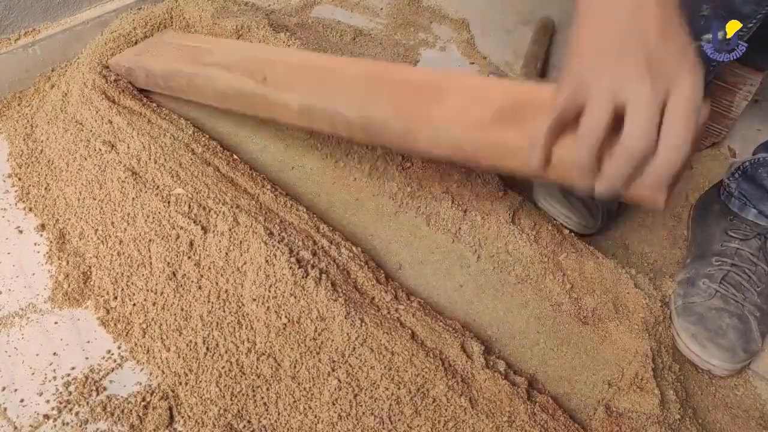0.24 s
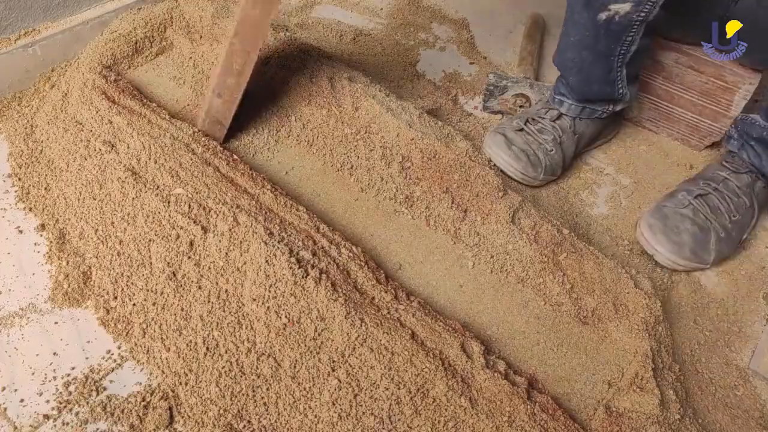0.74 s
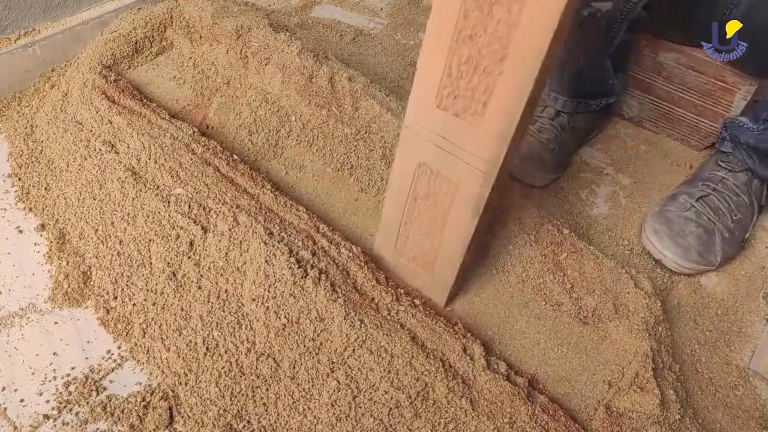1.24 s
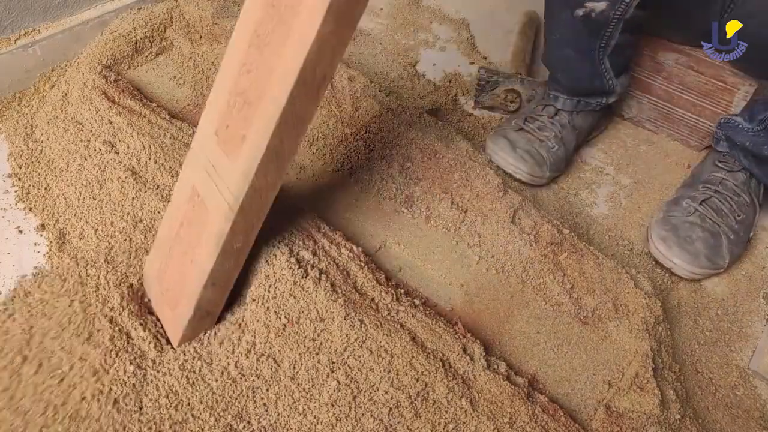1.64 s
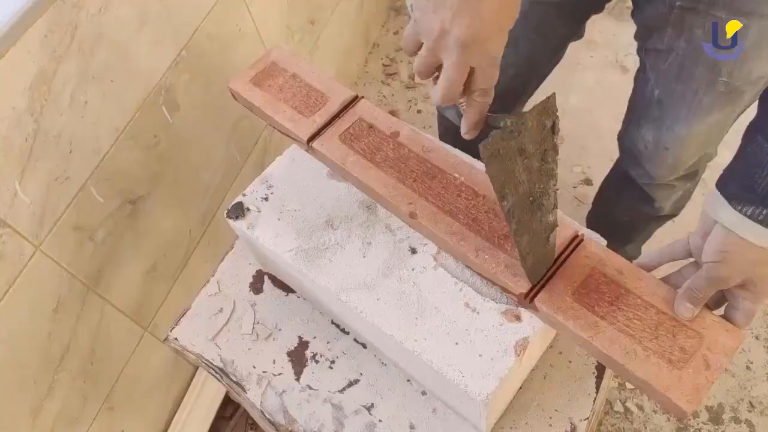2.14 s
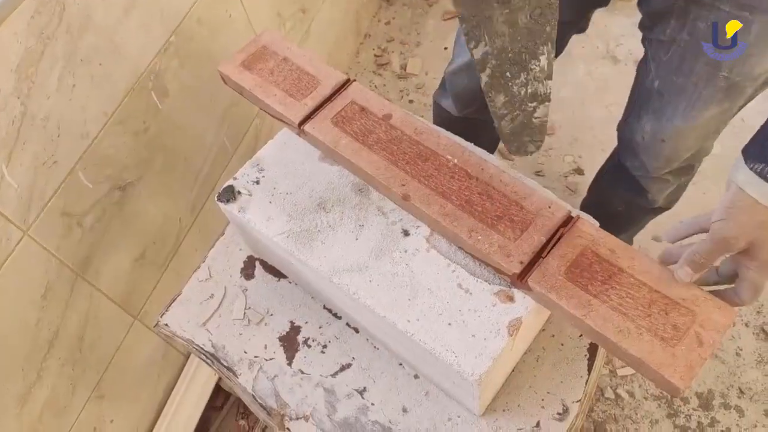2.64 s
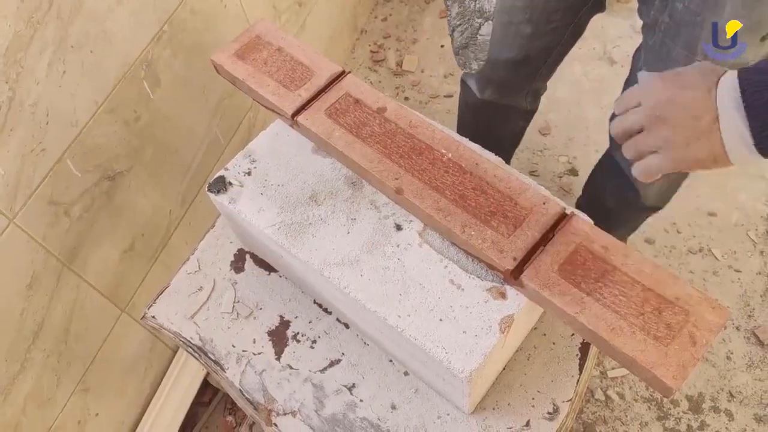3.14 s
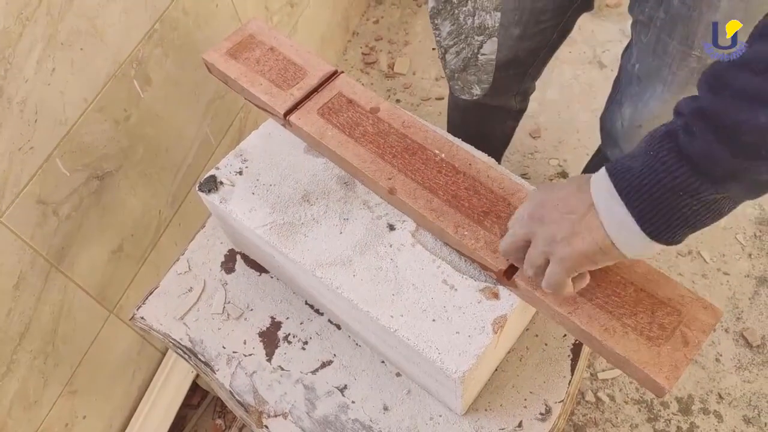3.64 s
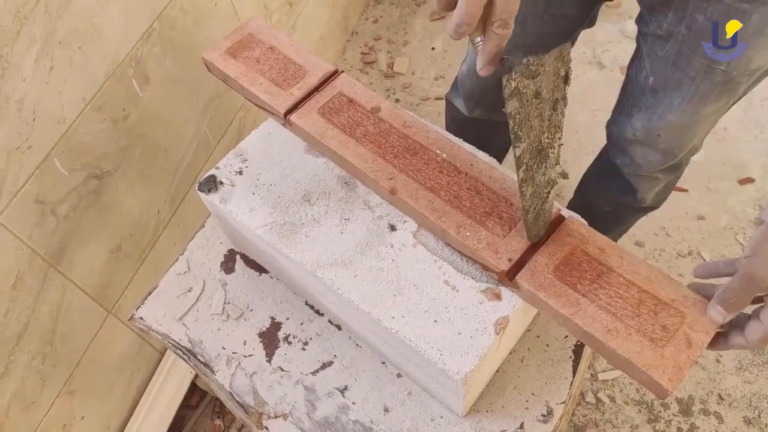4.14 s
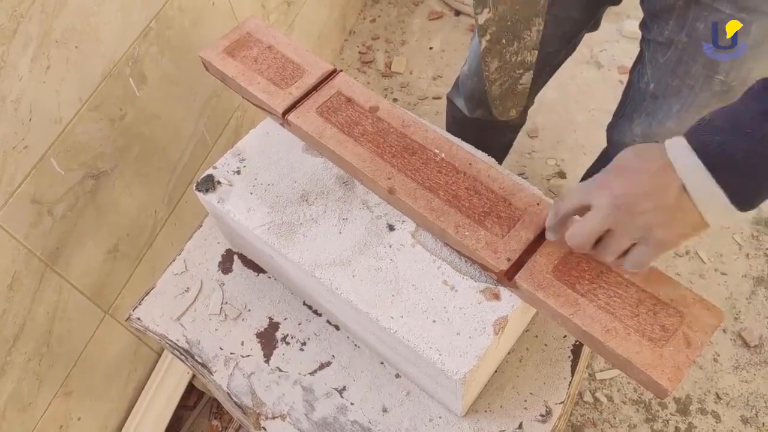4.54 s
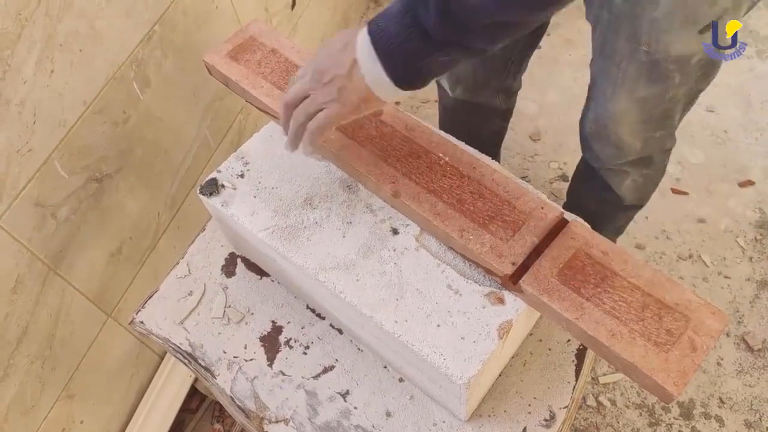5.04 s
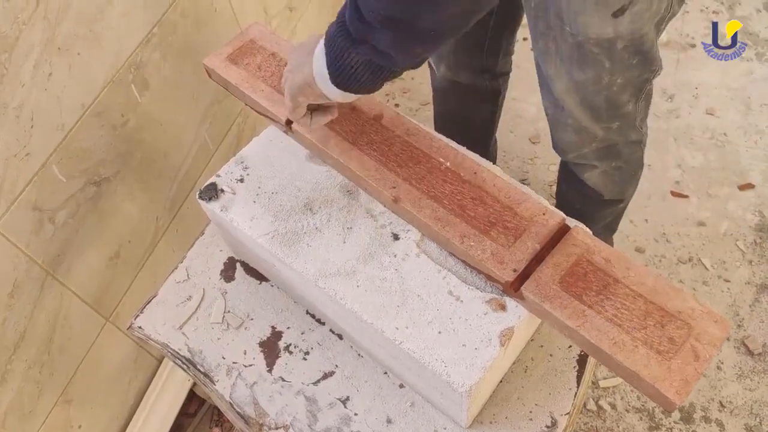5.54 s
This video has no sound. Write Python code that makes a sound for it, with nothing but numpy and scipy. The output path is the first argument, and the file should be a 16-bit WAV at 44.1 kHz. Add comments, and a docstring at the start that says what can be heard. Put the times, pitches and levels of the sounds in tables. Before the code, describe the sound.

Soft sandy rubbing and one heavy thud, then an airy outdoor rush with sharp trowel chops on brick, small clicks, finger scuffs and a brief wind gust.

```python
"""Masonry work at arm's length: contact noise, modal ringing and diffuse reflection. First a clay brick is
dragged out of sand, thumped on end and twisted: coloured noise under friction envelopes. Then the outdoor
background of filtered noise rises quickly, and a steel trowel chops three times: grit bursts crunch and
decaying sine modes ring. Fingers and blade scuff, knock and snap the pieces, and nearby walls echo. Late in the
scene a gust of low-frequency noise buffets the microphone."""
import sys
import numpy as np
from scipy import signal
from scipy.fft import rfft, irfft, next_fast_len
from scipy.io import wavfile
from scipy.ndimage import uniform_filter1d, minimum_filter1d

SR = 44100
rng = np.random.default_rng(int(sys.argv[2]) if len(sys.argv) > 2 else 0)


def wav_record(signal):
    """Record a signal, one row per channel, as 16-bit PCM in the file named by sys.argv[1]."""
    frames = np.transpose(np.atleast_2d(signal))
    bounded = np.clip(frames, -1, 1)
    # unit amplitude maps onto the largest positive 16-bit level
    quanta = np.round(bounded * 32767).astype(np.int16)
    wavfile.write(sys.argv[1], SR, quanta)


N = 255337
TIME = np.arange(N) / SR

# Rise, fall, attack, release, build and die times are exponential time constants.
# Spectra list relative levels; noise made from them is scaled to rms 1. L-R is left minus right.

# Outdoor rush spectrum: f/Hz, level/dB
RUSH_SPECTRUM = [(15, -42), (25, -9), (44, -11), (122, -11), (297, -0.5), (421, -3.5), (804, -4.5),
                 (1140, -9), (2300, -8), (2920, -16.5), (7100, -20.5), (9300, -31.5), (12200, -39),
                 (13900, -44), (15500, -62)]
# Wind buffeting spectrum: f/Hz, level/dB
BUFFET_SPECTRUM = [(12, -23), (25, -16), (48, 0), (90, -7.5), (160, -10.5), (300, -19), (800, -68)]
# Coherence of left and right in noise: f/Hz, correlation
STEREO_CORRELATION = [(40, 0.9), (120, 1), (250, 0.94), (450, 0.68), (1000, 0.19), (2000, -0.012),
                      (3500, -0.041), (7000, 0.018), (12000, 0.068)]
# Gust eddies thumping the microphone: t/s, level/dB
EDDIES = [(4.55, -47), (4.64, -42), (4.759, -28.5), (4.802, -29.5), (4.86, -43), (4.91, -42), (5.11, -44)]
# Friction of the sliding face: f/Hz, level/dB
SLIDE_SPECTRUM = [(50, -11), (130, -18.5), (190, -7), (280, -8), (480, -1), (750, -1.5), (1200, -5.5),
                  (1700, -12), (3000, -36)]
# Friction of the loaded, twisting end: f/Hz, level/dB
TWIST_SPECTRUM = [(50, -14), (130, -9.5), (220, -1.5), (340, 3.5), (520, -0.5), (700, -6.5), (1200, -18),
                  (3000, -55)]
# Hiss of loose sand grains: f/Hz, level/dB
SAND_SPECTRUM = [(400, -53), (800, -7), (1300, -4.5), (2400, -8), (4200, -13.5), (7000, -13.5), (9000, -23),
                 (12000, -31.5), (15000, -50)]
# Brick moving in sand, lifted out, then twisted on end: start t/s, full effort/s, rubbing level/dB
MOVES = [(.325, 0.22, -60.5), (1.425, 0.25, -55.5)]
# Grains spilled by each shove: start t/s, length/s, hiss level/dB
SPILLS = [(0.212, 0.035, -67.5), (0.307, 0.069, -61.5), (0.396, 0.1, -59.5), (0.623, .04, -61),
          (0.697, .04, -62.5), (.825, 0.03, -71.5), (.895, 0.031, -67.5), (1.547, 0.041, -61),
          (1.66, 0.065, -58), (1.816, 0.027, -66), (1.984, 0.045, -64.5), (2.08, 0.04, -64)]
# Brick bumping in sand: t/s, level/dB, rise/s, fall/s, treble tilt/(dB per octave)
BUMPS = [(.22, -56, 0.0028, 0.059, 2.5), (0.311, -50.5, 0.001, 0.016, 1.5),
         (0.554, -47.5, 0.0039, 0.013, -4), (0.709, -54, 0.0024, 0.032, 5.5),
         (0.9705, -21, 0.000613, 0.0085, -0.5), (1.17, -53.5, 0.019, 0.041, 3),
         (1.413, -56, 0.0026, 0.027, -8)]
# Sand-softened thud spectrum: f/Hz, level/dB
THUD_SPECTRUM = [(35, -24), (90, -15), (170, -14.5), (280, -3), (480, 3), (720, -3), (950, -7), (1350, -8),
                 (1900, -19), (2600, -18.5), (5000, -28), (8000, -34), (14000, -65)]
# Ground modes under the heaviest bump: f/Hz, level/dB, t60/s, L-R/dB
GROUND_MODES = [(80.9, -48, 0.92, 0), (278, -25.5, 0.1, 8), (411, -20.5, 0.069, -6), (507, -31, 0.049, 13)]
# Skin and steel rubbing on clay: f/Hz, level/dB
SCUFF_SPECTRUM = [(60, -23), (170, -15), (330, -14.5), (1000, -0.5), (1600, -1.5), (2300, 3.5),
                  (3300, -4.5), (6500, -4.5), (9000, -15), (13000, -25), (15500, -40)]
# Scuffs of fingers and blade: t/s, level/dB, fall/s, treble tilt/(dB per octave), L-R/dB
SCUFFS = [(2.378, -37.5, 0.017, -2.5, 1.5), (2.51, -28.5, .01, 3, -15), (2.811, -32.5, .03, -3.5, 2.5),
          (2.862, -29, .022, -6.5, 0), (3.135, -31.5, 0.017, -0.5, 3), (3.342, -44.5, 0.0097, 5, 0),
          (3.433, -42, 0.033, 2, 0), (3.827, -35, .012, 3, 0), (4.155, -39.5, .025, -1.5, -3),
          (4.447, -39.5, .011, -2, -3), (4.834, -41, 0.019, 3, -2), (4.93, -41, .01, -6, 6),
          (5.051, -30, 0.0075, 4, -3.5), (5.266, -35, 0.021, .5, 0), (5.286, -28.5, 0.0095, 3.5, -2),
          (5.582, -43.5, 0.0075, .5, 2.5), (5.695, -42.5, 0.013, 2, 0)]
# Clay pieces knocking: t/s, touch level/dB, ring f/Hz, ring level re touch/dB, ring t60/s
KNOCKS = [(3.1454, -35.5, 2310, 14.5, .03), (4.067, -32, 1130, 12, 0.028),
          (4.1282, -30.5, 1500, 8.5, 0.028), (5.034, -34.5, 1220, -11, .03),
          (5.283, -41.5, 1024, 12, 0.079), (5.425, -39.5, 2130, 8.5, .031)]
# Hard points of clay snapping: t/s, level before the onset ramp/dB, L-R/dB
SNAPS = [(3.1446, -5, 3.5), (4.0274, -16, 5), (4.362, -11.5, 13), (5.0506, -40, -8), (5.285, -18, -9),
         (5.2855, -13.5, 2)]
# Crumbling clay spectrum: f/Hz, level/dB
CRUNCH_SPECTRUM = [(60, -49), (150, -19), (260, -10.5), (450, -6.5), (750, -4.5), (1400, 2.5), (2300, 6),
                   (3300, -2), (4500, -1), (6000, 1.5), (8000, -3), (11500, -5.5), (13000, -11),
                   (15500, -17)]
# Brick modes under the blade: f/Hz, level/dB, t60/s, L-R/dB
BRICK_MODES = [(397, -50, 0.034, -24), (544, -20.5, 0.18, 7), (642, -25.5, 0.11, 0), (775, -8.5, 0.045, -4),
               (949, -9.5, 0.029, 12.5), (1393, -8, 0.015, 16), (1658, 0, 0.058, 2), (1790, -22, .06, -9),
               (2020, -24, 0.023, 18), (2125, 1, 0.027, 4.5), (2125, -6, 0.04, 22), (2408, -16, 0.12, -11),
               (2724, -23, 0.21, -1), (2934, -26, 0.073, -18), (3870, -40, 0.094, 11),
               (5480, -16, 0.022, 6), (5500, -27, 0.026, -7), (7200, -31.5, 0.059, 16),
               (12400, -44, .05, -4)]
# Trowel contacts: t/s, level/dB, rise/s, crushing time/s, fall/s, treble tilt/(dB per octave),
# ring level re crunch/dB, bite (upper modes re lower)/dB
CHOPS = [(2.224, -29, .0052, 0.0088, .0056, -0.5, -4, 8),
         (2.233, -10.5, .0018, 0.017, 0.0047, -1.16, -4, 6.5),
         (2.519, -5.5, .0012, 0.011, 0.0066, -1.5, -8, 0), (4.3604, -21, .00057, 0.00069, 0.0019, 2, 4, -5),
         (4.3652, -13, .0003, 0.00083, 0.0083, -3, 3, -3)]

# The background is faint at first, rises quickly just before the chops, then slowly sinks.
CALM_DB, RUSH_DB, RUSH_SAG_DB_PER_S = -73.5, -41.5, 0.67
RUSH_FULL_S, RUSH_SWELL_S = 2.209, 0.062
# A gust builds and dies back to a light breeze.
GUST_S, GUST_BUILD_S, GUST_DIE_S = 4.86, .24, 0.33
GUST_DB, BREEZE_DB, GUST_PAN_DB = -46, -68, -6
EDDY_RISE_S, EDDY_FALL_S = 0.0089, 0.012
MOVE_ATTACK_S, MOVE_RELEASE_S = 0.036, 0.2
SPILL_ATTACK_S, SPILL_RELEASE_S = 0.0095, 0.017
TRICKLE_DB, SHOVE_DB = -9, -3.5  # hiss that goes with any rubbing; rubbing that goes with each spill
SCUFF_RISE_SHARE = .45  # rise as a share of fall
KNOCK_RISE_S, KNOCK_FALL_S, KNOCK_CONTACT_S = .0012, 0.018, .0005
KNOCK_TILT_DB, KNOCK_PAN_DB = -6, 2  # tilt per octave
SNAP_HZ, SNAP_RISE_S, SNAP_T60_S = 5950, 0.00013, 0.003
UPPER_MODES_HZ = 1900
NEAR_RING_DB, WALL_RING_DB = -7, -2.5  # ring, against the grit, sent to the ground and to the walls
DIP_S, DIP_LENGTH_S, DIP_EDGE_S, DIP_DB = 4.028, .016, .004, -22
CEILING, TOP_HZ = .86, 15500


def undb(db):
    """Amplitude ratio of a level in decibels."""
    return 10 ** (np.asarray(db) / 20)


def unit(x):
    """Normalise the mean-square amplitude to one."""
    return x / np.sqrt(np.mean(x ** 2))


def across(points, hz):
    """Interpolate a spectrum linearly along a logarithmic frequency axis."""
    f, value = np.transpose(points)
    return np.interp(np.log(hz + 1), np.log(f), value)


def pan(db):
    """Interaural level difference, split evenly between left and right gains."""
    return undb(np.array([[db], [-db]]) / 2)


def add(out, start, x):
    """Linear superposition: mix x in from a start time."""
    i = max(int(start * SR), 0)
    out[:, i:i + x.shape[1]] += x[:, :N - i]


def swell(start, hold, attack, release):
    """Exponential growth up to the start time, a plateau, then exponential decay."""
    before = np.minimum(TIME - start, 0)
    after = np.maximum(TIME - start - hold, 0)
    return np.exp(before / attack - after / release)


def walk(rate):
    """Smoothed random fluctuation with a spread near 1 and about `rate` new values a second."""
    k = int(SR / rate)
    return uniform_filter1d(np.repeat(rng.standard_normal(N // k + 1), k), k)[:N]


def noise(points, size, tilt_db=0, grain_db=0):
    """Spectral shaping of partly coherent stereo noise, rms 1; uneven short grains make it gritty."""
    hz = np.fft.rfftfreq(size, 1 / SR)
    grains = np.minimum(rng.exponential(size=size // 16 + 1), 5.5)
    grit = undb(grain_db * np.repeat(grains, 16)[:size])
    mid, side = rfft(rng.standard_normal((2, size)) * grit)
    # the mid-to-side energy ratio sets the correlation of the two channels
    alike = np.clip(across(STEREO_CORRELATION, hz), -.95, .95)
    mid, side = mid * np.sqrt(1 + alike), side * np.sqrt(1 - alike)
    tilt = tilt_db * np.log2(np.clip(hz, 400, 8000))
    gain = undb(across(points, hz) + tilt)
    return unit(irfft(np.array([mid + side, mid - side]) * gain, size))


def steady(points, grain_db=0):
    """Stationary coloured noise for the whole scene."""
    return noise(points, next_fast_len(N, True), 0, grain_db)[:, :N]


def burst(points, rise, hold, fall, tilt_db, grain_db, slip_db, size=16384):
    """Transient friction: grit swells, holds and dies in uneven slips. Returns lead time and sound."""
    lead = 4 * rise
    t = np.arange(size) / SR - lead
    shape = np.exp(np.minimum(t, 0) / rise - np.maximum(t - hold, 0) / fall)
    slips = np.repeat(rng.uniform(-1, 1, size // 64), 64)
    slip_gain = unit(undb(slip_db * uniform_filter1d(slips, size=16)))
    return lead, shape * slip_gain * noise(points, size, tilt_db, grain_db)


def ring(modes, push, rise, rattle, size=32768):
    """Modal superposition: sines last through the push, then decay; a rattling contact wanders their phase."""
    t, out = np.arange(size) / SR, 0
    for hz, db, t60, pan_db in modes:
        wander = rattle * np.cumsum(rng.standard_normal(size)) / np.sqrt(SR)
        phase = rng.uniform(0, 2 * np.pi) + wander
        # the left ear hears it slightly later, give or take a random phase
        ears = np.array([[0], [rng.normal(0, 0.053) + hz / 5000]])
        onset = 1 - np.exp(-t / rise)
        decay = np.exp(-np.log(1000) * np.maximum(t - push, 0) / t60)
        out = out + undb(db) * pan(pan_db) * onset * decay * np.sin(2 * np.pi * hz * t + phase + ears)
    return out


def echo(x, low_t60, high_t60, size=40000):
    """Diffuse reverberation: convolution with noise decaying octave by octave, treble first."""
    t, hz = np.arange(size) / SR, np.fft.rfftfreq(size, 1 / SR)
    white = rfft(noise([(20, 0), (20000, 0)], size))
    octave = np.clip(np.log2((hz + 1) / 125), 0, 7)
    tail = 0
    for k, t60 in enumerate(np.geomspace(low_t60, high_t60, num=8)):
        band = irfft(white * np.maximum(1 - abs(octave - k), 0), size)
        tail = tail + band * np.exp(-np.log(1000) * t / t60)
    tail = tail * (1 - np.exp(-t / 0.0012))
    return signal.fftconvolve(x, tail / np.sqrt(np.sum(tail ** 2) / 2), axes=1)[:, :N]


def outdoors():
    """Broadband rush, and turbulent pressure from a gust at two independent ports, mostly the right."""
    risen = np.clip(1 + (TIME - RUSH_FULL_S) / RUSH_SWELL_S, 0, 1)
    sinking_db = RUSH_DB - RUSH_SAG_DB_PER_S * (TIME - RUSH_FULL_S)
    rush_db = CALM_DB + risen * (sinking_db - CALM_DB)
    rush = undb(rush_db + 1.0 * walk(15)) * steady(RUSH_SPECTRUM, grain_db=1.34)
    gust = undb(GUST_DB) * swell(GUST_S, 0, GUST_BUILD_S, GUST_DIE_S) + undb(BREEZE_DB) * risen
    eddies = sum(undb(db) * swell(s, 0, EDDY_RISE_S, EDDY_FALL_S) for s, db in EDDIES)
    flutter = undb(1.6 * walk(35))
    # a separate noise for each port
    ports = np.array([steady(BUFFET_SPECTRUM)[side] for side in range(2)])
    return rush + (gust + eddies) * flutter * pan(GUST_PAN_DB) * ports


def dragging():
    """Dry friction: the brick rubs dully on packed sand in uneven slips; grains crackle with each shove."""
    lift, twist = (undb(db) * swell(s, hold, MOVE_ATTACK_S, MOVE_RELEASE_S) for s, hold, db in MOVES)
    spill_power = sum((undb(db) * swell(s, hold, SPILL_ATTACK_S, SPILL_RELEASE_S)) ** 2
                      for s, hold, db in SPILLS)
    spill = np.sqrt(spill_power)
    slide = np.hypot(lift, undb(SHOVE_DB) * spill)
    rub = slide * steady(SLIDE_SPECTRUM, grain_db=3.0) + twist * steady(TWIST_SPECTRUM, grain_db=1.0)
    hiss = np.hypot(spill, undb(TRICKLE_DB) * (lift + twist))
    grains = hiss * steady(SAND_SPECTRUM, grain_db=2.0)
    return undb(0.68 * walk(45.4)) * rub + undb(0.89 * walk(70)) * grains


def bumps():
    """Damped impact: sand softens bumps to thuds that the walls return; the heaviest shakes the ground."""
    out = np.zeros((2, N))
    for s, db, rise, fall, tilt_db in BUMPS:
        lead, thud = burst(THUD_SPECTRUM, rise, 0, fall, tilt_db, grain_db=1.0, slip_db=3.0)
        add(out, s - lead, undb(db) * thud)
    out = out + undb(-6) * echo(out, low_t60=1.07, high_t60=0.37)
    heaviest = max(BUMPS, key=lambda row: row[1])
    add(out, heaviest[0], ring(GROUND_MODES, 0, rise=0.0038, rattle=2.3))
    return out


def scuffs():
    """Sliding friction: fingers and blade make short gritty touches on the brick."""
    out = np.zeros((2, N))
    for s, db, fall, tilt_db, pan_db in SCUFFS:
        rise = SCUFF_RISE_SHARE * fall
        lead, touch = burst(SCUFF_SPECTRUM, rise, 0, fall, tilt_db, grain_db=2.5, slip_db=-3.0)
        add(out, s - lead, undb(db) * pan(pan_db) * touch)
    return out


def knocks():
    """Impact excitation: each knock of clay pieces is a gritty touch and one briefly ringing mode."""
    out = np.zeros((2, N))
    for s, db, hz, ring_db, t60 in KNOCKS:
        lead, touch = burst(SCUFF_SPECTRUM, KNOCK_RISE_S, 0, KNOCK_FALL_S, KNOCK_TILT_DB,
                            grain_db=2.5, slip_db=4.5)
        add(out, s - lead, undb(db) * pan(KNOCK_PAN_DB) * touch)
        mode = (hz, db + ring_db, t60, KNOCK_PAN_DB)
        add(out, s, ring([mode], 0, rise=KNOCK_CONTACT_S, rattle=22.0, size=4096))
    return out


def snaps():
    """Brittle fracture: hard points of clay snap with a sharp click, one very short high mode."""
    out = np.zeros((2, N))
    for s, db, pan_db in SNAPS:
        mode = (SNAP_HZ, db, SNAP_T60_S, pan_db)
        add(out, s, ring([mode], 0, rise=SNAP_RISE_S, rattle=11.0, size=4096))
    return out


def trowel():
    """Forced modal vibration: the blade crushes clay and drives the brick; returns crunch and ring."""
    crunches, rings = np.zeros((2, 2, N))
    for s, db, rise, crush, fall, tilt_db, ring_db, bite_db in CHOPS:
        lead, crunch = burst(CRUNCH_SPECTRUM, rise, crush, fall, tilt_db, grain_db=-2.0, slip_db=3.5)
        add(crunches, s - lead, undb(db) * crunch)
        # where the blade bites sets the balance of the modes
        modes = [(hz, mode_db + bite_db * (hz > UPPER_MODES_HZ), t60, pan_db)
                 for hz, mode_db, t60, pan_db in BRICK_MODES]
        add(rings, s, undb(db + ring_db) * ring(modes, crush, rise=0.001, rattle=11.9, size=8192))
    return crunches, rings


def dip():
    """Amplitude modulation: the level dips briefly once and comes back."""
    inside = np.minimum(TIME - DIP_S, DIP_S + DIP_LENGTH_S - TIME)
    return undb(DIP_DB * np.clip(inside / DIP_EDGE_S, 0, 1))


def scene():
    """Superposition of the air, the work, and its reflections from the ground and the walls."""
    background = outdoors() + dragging() + bumps()
    crunches, rings = trowel()
    grit = crunches + scuffs() + knocks() + snaps()
    near = undb(-10.0) * echo(grit + undb(NEAR_RING_DB) * rings, low_t60=0.23, high_t60=0.072)
    walls = undb(-18) * echo(grit + undb(WALL_RING_DB) * rings, low_t60=0.61, high_t60=0.2)
    return (background + grit + rings + near + walls) * dip()


def record(dry):
    """Peak limiting by a fast smoothed gain, then an elliptic low-pass that cuts the top."""
    headroom = np.minimum(1, CEILING / (np.abs(dry).max(axis=0) + 1e-9))
    gain = uniform_filter1d(minimum_filter1d(headroom, size=100), size=100)
    low_pass = signal.ellip(8, .2, 70, TOP_HZ, fs=SR, output="sos")
    return signal.sosfilt(low_pass, dry * gain)


dry = scene()
out = record(dry)
wav_record(out)
```